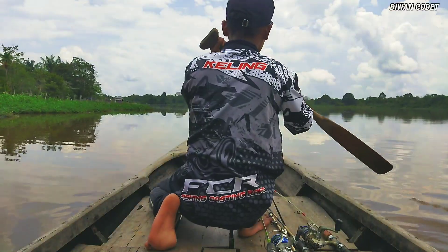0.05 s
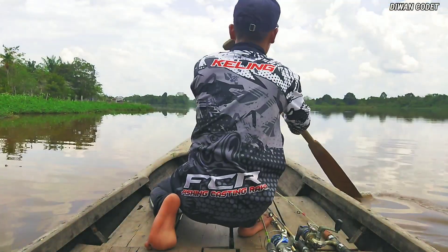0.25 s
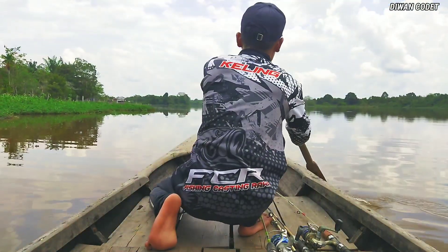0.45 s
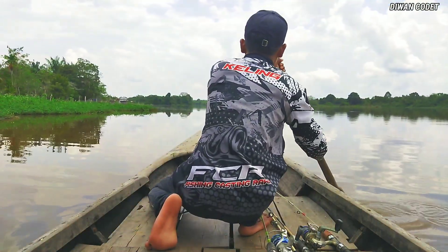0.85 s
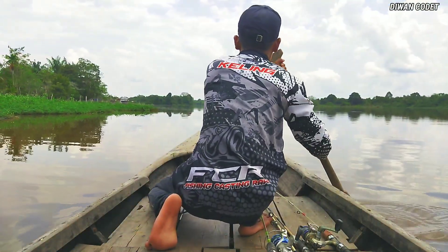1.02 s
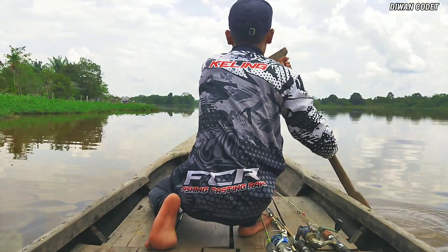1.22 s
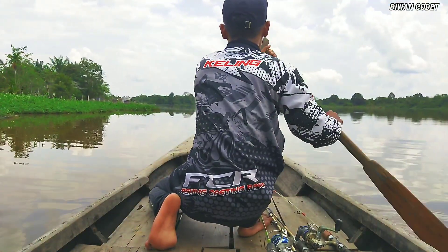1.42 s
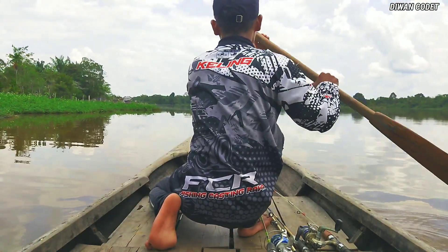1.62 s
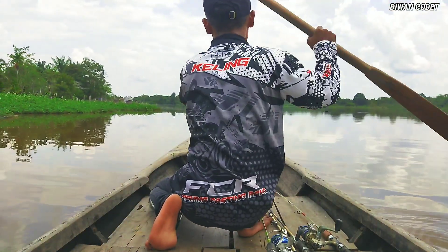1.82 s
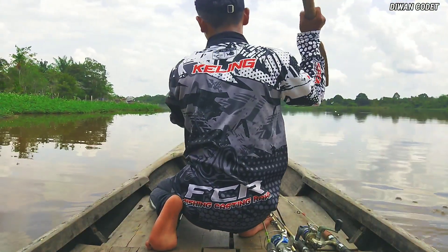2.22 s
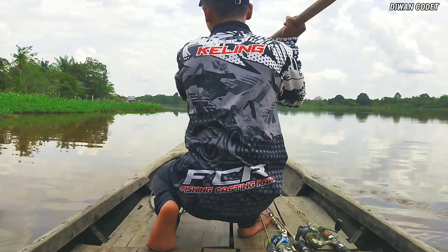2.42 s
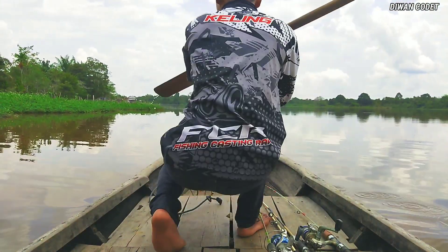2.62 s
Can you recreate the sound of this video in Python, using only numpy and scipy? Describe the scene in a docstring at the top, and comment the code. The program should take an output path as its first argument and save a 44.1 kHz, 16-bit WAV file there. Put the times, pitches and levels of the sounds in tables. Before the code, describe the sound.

Dry, high wooden creaks from a paddle and canoe come in close, squeaky runs, strongest from 0.4 to 1.2 seconds. At about 1.2 seconds the paddle hits the hull with one heavy, hollow thud. The creaking resumes at 1.6 with a brief sliding squeak and runs until 2.5, with a light tap near 2.4 and sharp ticks to 2.7. Soft water washes, gurgles and drips throughout.

```python
"""On a calm river, a wooden canoe is being paddled. Dry, high creaks come in runs, like a tight joint
sticking and slipping: trains of slips ring high, dry resonances, with ticks, chirps and one sliding
whistle. The paddle bumps the hull once heavily, and its shaft gives a faint tap and a light one.
Water washes, gurgles and drips off the blade, made of ringing bubbles over a soft rush."""
import sys
import numpy as np
from scipy import signal
from scipy.fft import rfft, irfft, next_fast_len
from scipy.io import wavfile
from scipy.ndimage import uniform_filter1d, map_coordinates

SR = 44100
rng = np.random.default_rng(int(sys.argv[2]) if len(sys.argv) > 2 else 0)


def store_wav(level_fs):
    """Save 16-bit WAV to argv[1]."""
    pcm = np.round(np.clip(np.atleast_2d(level_fs), -1, 1) * 32767)
    wavfile.write(sys.argv[1], SR, pcm.T.astype(np.int16))


N = 121275
T = np.arange(N) / SR


def amp(db):
    return 10 ** (np.asarray(db) / 20)


def unit(x):
    return x / np.sqrt(np.mean(abs(x) ** 2) + 1e-20)


def along(points, hz):
    """Read (Hz, value) points on a log frequency axis."""
    freqs, values = np.transpose(points)
    return np.interp(np.log(hz + 1), np.log(freqs + 1), values)


def curves(rows):
    """One automation curve for each column after the time."""
    times, *columns = np.transpose(rows)
    return [np.interp(T, times, column) for column in columns]


def filtered(x, response):
    """Pass x through a complex frequency response."""
    size = next_fast_len(N + SR // 2)
    return irfft(rfft(x, size) * response(np.fft.rfftfreq(size, 1 / SR)), size)[..., :N]


def coloured(x, eq):
    """x through an EQ of (Hz, dB) points, at rms 1."""
    return unit(filtered(x, lambda hz: amp(along(eq, hz))))


def noise(eq):
    return coloured(rng.standard_normal(N), eq)


def wobble(rate):
    """A smooth random curve, rate knots a second."""
    return map_coordinates(rng.standard_normal(4096), [T * rate], mode="wrap")


def decay(start, t60, attack):
    """Envelope of something struck; times in seconds."""
    age = np.maximum(T - start, 0)
    return amp(-60 * age / t60) * (1 - np.exp(-age / attack))


def gate(rows):
    """Open from the first row's time to the last, with 2 ms fades."""
    return np.clip(1 + np.minimum(T - rows[0][0], rows[-1][0] - T) / .002, 0, 1)


def placed(x, lag_s, wet_db, t60):
    """Stereo with short reflections from the boat; a positive lag reaches the right side first."""
    t = np.arange(SR // 4) / SR
    tail = rng.standard_normal((2, len(t))) * amp(-60 * t / t60) * (t > .001)
    wet = signal.fftconvolve(x[None], tail / np.linalg.norm(tail[0]), axes=1)[:, :N]
    direct = filtered(x, lambda hz: np.exp(np.outer([-1, 1], 1j * np.pi * hz * lag_s)))
    return direct + amp(wet_db) * wet


def panned(pair, balance):
    """Tip the stereo balance by frequency."""
    return filtered(pair, lambda hz: amp(np.outer([.5, -.5], along(balance, hz))))


def slips(rate, width_s, jitter, scatter_db):
    """Stick and slip: an uneven train of short swells, each with its own size and phase."""
    gap, size, turn = rng.standard_normal((4000, 3)).T
    at = (np.cumsum(np.exp(jitter * gap)) / rate * SR).astype(int)
    train = np.zeros(N, complex)
    train[at[at < N]] = (amp(scatter_db * size) * np.exp(1j * np.pi * turn))[at < N]
    t = np.arange(-256, 257) / SR
    return unit(signal.fftconvolve(train, np.exp(-.5 * (t / width_s) ** 2), "same"))


def joint_response(hz):
    """The squeaky joint: a broad body with sharp resonances."""
    # Each row: frequency in Hz, gain in dB.
    body = [(2700, -18), (3250, 2), (3650, 0.5), (4100, 4), (4450, 1), (4700, 4), (5250, 4.5), (5750, 4),
            (6300, -22)]
    # Each row: centre in Hz, width in Hz, relative level in dB.
    resonances = [(3740, 25, -4.5), (4093, 19.6, 1), (4140, 20, -26), (4646, 27, 0), (4730, 54, -0.5)]
    peaks = sum(amp(db) * 1j * hz * width / (centre ** 2 - hz ** 2 + 1j * hz * width)
                for centre, width, db in resonances)
    return amp(along(body, hz)) * (1 + amp(1) * peaks)


def creaks():
    """Big slips and fine chatter ring a shifting squeal and a hollow undertone; a rasp pulses along."""
    # One list per creak. Each row: time in seconds, squeal in dB, pitch in Hz, rasp in dB (both pre-EQ).
    gestures = [
        [(0, -33, 4830, -34), (.05, -28, 4770, -39.5), (.075, -53, 4700, -40.5), (.13, -45, 4700, -50),
         (.154, -24.5, 4740, -61), (.18, -42, 4360, -59)],
        [(.211, -31, 4795, -53), (.266, -26.5, 4676, -39), (.28, -66, 4700, -70), (.296, -23, 4620, -58),
         (.34, -32, 4770, -66), (.378, -42, 4800, -59)],
        [(.396, -19, 4690, -32.5), (.42, -14.5, 4580, -28), (.438, -22, 4170, -31), (.448, -29, 4200, -49),
         (.482, -24, 4460, -55)],
        [(.489, -10.5, 4163, -32), (.51, -13, 4400, -40.5), (.54, -18.5, 4550, -40.5), (.556, -25, 4660, -41.5),
         (.59, -28, 4750, -44)],
        [(.598, -19.5, 4825, -29.5), (.62, -17, 4480, -35.5), (.642, -16, 4320, -31), (.69, -17, 4160, -40.5),
         (.724, -16.5, 4170, -44)],
        [(.73, -29, 4342, -59), (.765, -30.5, 4330, -52.5), (.825, -35.5, 5050, -48),
         (.875, -26.5, 4600, -52.5), (.925, -28, 4360, -45.5)],
        [(.935, -18, 4870, -30), (.98, -18, 4637, -28), (1.022, -18, 4710, -31), (1.038, -23.5, 4550, -37.5),
         (1.09, -23, 5190, -35.5), (1.142, -27, 4970, -39), (1.18, -30, 4670, -31)],
        [(1.584, -22.5, 4814, -35.5), (1.605, -21.5, 4807, -31.5), (1.63, -30.5, 3647, -40),
         (1.66, -22.5, 3680, -40), (1.68, -22.5, 4097, -37.5), (1.712, -19.5, 4240, -35.5),
         (1.745, -33, 4620, -46.5), (1.768, -27, 4540, -40)],
        [(1.775, -25.5, 4870, -36), (1.82, -20, 4260, -34), (1.905, -20, 4184, -38.5), (1.94, -33.5, 4450, -43),
         (2.02, -34.5, 5780, -44), (2.1, -58, 4400, -44)],
        [(2.181, -27, 4260, -40), (2.194, -19, 4695, -30.5), (2.28, -21.5, 4624, -33.5),
         (2.325, -26, 4570, -41.5), (2.42, -22.5, 4495, -42.5), (2.48, -25, 4270, -41.5),
         (2.51, -40, 4370, -34.5)],
    ]
    # Each row, one per creak: slips per second, big slips over chatter in dB, undertone over rasp in dB.
    friction = [(109, 0.5, 3.5), (114.8, 15, 7), (197.5, -30, -0.5), (231.7, 8.5, 2.5), (140.5, 3.5, -2.5),
                (80, 8, 11.5), (142.2, -6, 4), (170.3, -4, 1.5), (139, 1, -7), (120.8, -1, 1)]
    # Tone of the rasp and of the joint's lower ring. Each row: frequency in Hz, gain in dB.
    rasp_eq = [(900, -6.5), (1800, -2), (2700, 4), (3300, -11), (3900, 13), (5500, 13), (6200, -40),
               (7350, -16.5), (8200, -2.5), (11500, 2.5), (13500, -1.5), (15000, 2.5), (15900, -30)]
    hollow_eq = [(1400, -23), (1950, -12.5), (2250, 1.5), (2750, 2.5), (2980, -0.5), (3250, -38),
                 (4000, -41)]
    hollow_hz = 2583
    squeal, rasp_envelope, hollow = np.zeros((3, N))
    for rows, (rate, slip_db, hollow_db) in zip(gestures, friction):
        squeal_db, pitch_hz, rasp_db = curves(rows)
        big = amp(slip_db) * slips(rate, width_s=.00047, jitter=.0821, scatter_db=2)
        chatter = slips(rate=750, width_s=.00024, jitter=.25, scatter_db=1.6)
        power = uniform_filter1d(abs(big + chatter) ** 2, size=600)
        drive = gate(rows) * (big + chatter) / np.sqrt(abs(power) + 1e-6)
        squeal += amp(squeal_db) * np.real(drive * np.exp(2j * np.pi * np.cumsum(pitch_hz) / SR))
        hollow += amp(rasp_db + hollow_db) * np.real(drive * np.exp(2j * np.pi * hollow_hz * T))
        rasp_envelope += gate(rows) * amp(rasp_db) * np.sqrt(.44 * abs(drive) ** 2 + .17)
    squeal = filtered(amp(-2.5) * squeal, joint_response)
    hollow = filtered(hollow, lambda hz: amp(along(hollow_eq, hz)))
    return squeal + hollow + amp(1) * rasp_envelope * noise(rasp_eq)


def bubbles(count, low_hz, high_hz, cycles, scatter_db):
    """A cloud of small bubbles, each rising in pitch as it dies away, at rms 1."""
    when, pitch, size = rng.random((count, 3)).T[:, :, None]
    t = np.arange(1500) / SR
    hz = low_hz * (high_hz / low_hz) ** pitch
    age = t * hz / cycles
    envelope = amp(-scatter_db * np.log(np.maximum(size, .02))) * amp(-60 * age)
    ring = envelope * np.sin(2 * np.pi * hz * t * (1 + .13 * np.minimum(age, 1)))
    at = (when * N + t * SR).astype(int)
    return unit(np.bincount(at.ravel(), ring.ravel(), N)[:N])


def water():
    """Splash and gurgle along the blade, bubbles over a soft rush; the hull drums faintly on the water."""
    # Each row: time in seconds, splash level in dB, gurgle level in dB.
    wash = [(0, -33.5, -61), (.27, -32.5, -61), (.37, -43, -53), (.45, -34.5, -50), (.55, -42, -47.5),
            (.8, -40.5, -45), (.93, -43.5, -44.5), (1.12, -39.5, -45), (1.25, -40, -42.5), (1.34, -45, -58),
            (1.42, -40.5, -38), (1.56, -40.5, -50.5), (1.8, -42.5, -54), (1.98, -41, -57.5),
            (2.07, -40.5, -51), (2.16, -48, -50.5), (2.32, -48.5, -50), (2.5, -38.5, -52),
            (2.58, -44.5, -51), (2.68, -37.5, -56), (2.75, -37, -44.5)]
    # Bright spray and dark churn. Each row: frequency in Hz, gain in dB.
    splash_eq = [(900, -16.5), (1700, -17), (2400, -3.5), (3150, -3.5), (3800, 5.5), (4700, 4.5), (5600, 0),
                 (6800, -1), (7400, -14), (12000, -4.5), (15000, -14), (16000, -28)]
    gurgle_eq = [(25, -96), (70, -21), (150, 0), (260, -1.5), (450, 6), (800, 2), (1400, -0.5), (2500, -2),
                 (6000, -74)]
    # Each row: frequency in Hz, left minus right in dB.
    splash_balance = [(2000, 3), (5000, 0.5), (7000, 7), (12000, 2)]
    splash_db, gurgle_db = curves(wash)
    fizz = bubbles(count=2600, low_hz=1800, high_hz=11000, cycles=40, scatter_db=3)
    splash = amp(splash_db + 1.5 * wobble(40)) * coloured(fizz + .7 * rng.standard_normal(N), splash_eq)
    glug = bubbles(count=350, low_hz=276, high_hz=2200, cycles=7.8, scatter_db=7.5)
    gurgle = amp(gurgle_db + 1.5 * wobble(14)) * unit(noise(gurgle_eq) + .6 * coloured(glug, gurgle_eq))
    rumble_eq = [(25, -52), (60, -14), (110, -9.5), (155, -10), (220, -4.5), (400, -8.5), (1000, -43)]
    body = gurgle + plops_and_drips() + amp(-55) * noise(rumble_eq)
    spray = panned(placed(splash, lag_s=.000395, wet_db=6, t60=.058), splash_balance)
    return spray + placed(body, lag_s=.00012, wet_db=-3, t60=.19)


def plops_and_drips():
    """Air pockets swell, ring unsteadily and glide as the water closes over them."""
    # Closing pockets, and drops falling from the blade.
    # Each row: start in seconds, level in dB, pitch in Hz, glide in octaves a second, t60 in seconds.
    plops = [(0.43, -20, 546, -1, 0.061), (0.454, -15.5, 1540, -2, 0.018), (0.459, -29, 1180, 2.5, 0.13),
             (0.921, -22.5, 361, -10, 0.042), (1.079, -22.5, 780, -19, 0.052),
             (1.085, -24.5, 600, -8.5, 0.14), (1.402, -18.5, 330, 15.5, 0.065),
             (1.417, -25, 420, -6.5, 0.11), (1.787, -27, 780, 15, 0.05), (1.881, -30, 554, 0, 0.098),
             (1.89, -29, 690, 6.5, 0.048), (2.066, -29.5, 1560, 2.5, 0.079), (2.07, -21.5, 2200, 1, 0.041),
             (2.099, -33, 400, 3, 0.21), (2.2, -31.5, 520, 1.5, 0.095), (2.306, -33.5, 660, -2, .12)]
    drips = [(0.092, -21.5, 3044, 8, 0.059), (0.263, -22, 2150, 5.5, 0.074),
             (0.475, -19.5, 2420, -1.5, 0.053), (1.25, -15, 2387, 4, 0.015), (2.113, -27, 2640, 2.5, 0.24),
             (2.474, -27, 2297, 1, 0.094), (2.526, -27, 3074, 4, 0.071), (2.655, -20, 2880, 5, 0.07)]
    out = np.zeros(N)
    for start, db, hz, glide, t60 in plops + drips:
        pitch_hz = hz * 2 ** (glide * np.clip(T - start, 0, t60))
        phase = 2 * np.pi * np.cumsum(pitch_hz) / SR + wobble(hz / 5)
        out += amp(db) * decay(start, t60, attack=.49 / hz) * np.sin(phase)
    return out


def ticks():
    """Sharp, bright snaps as the joint lets go."""
    # Each row: start in seconds, level in dB, t60 in seconds.
    snaps = [(0.294, -35, .03), (1.153, -25, 0.034), (1.163, -26, 0.034), (2.41, -27.5, 0.01),
             (2.555, -25, 0.012), (2.611, -27, 0.026), (2.625, -48, 0.04), (2.656, -42, .035),
             (2.667, -25, 0.064)]
    # Each row: frequency in Hz, gain in dB.
    snap_eq = [(1200, -7), (2800, -4.5), (5000, 11), (6600, 8.5), (7600, -4), (10000, 2), (15000, -11.5)]
    return noise(snap_eq) * sum(amp(db) * decay(start, t60, attack=.00051) for start, db, t60 in snaps)


def knocks(blows, modes, swell_cycles, contact_eq, contact_db, contact_t60, attack):
    """Struck wood: a puff of contact noise, then modes that swell over a few cycles, the low ones last."""
    out = np.zeros(N)
    for start, db in blows:
        ring = np.zeros(N)
        for k, (hz, mode_db, t60) in enumerate(modes):
            envelope = amp(mode_db) * decay(start, t60, swell_cycles / hz)
            ring += (-1) ** k * envelope * np.sin(2 * np.pi * hz * (T - start))
        contact = amp(contact_db) * noise(contact_eq) * decay(start, contact_t60, attack)
        out += amp(db) * (ring + contact)
    return out


def paddle_taps():
    """The paddle touches the hull lightly: a clack, and the shaft rings."""
    # Each row: start in seconds, level in dB.
    taps = [(.428, -41.5), (2.387, -31.5)]
    # Each row: pitch in Hz, relative level in dB, t60 in seconds.
    shaft_modes = [(140.8, -2.5, 0.38), (169, -4, 0.39), (269, -4, 0.22), (615, 3, 0.11),
                   (664, -4.5, 0.099), (840, 12, 0.043), (1210, 6, 0.12), (1314, 2.5, 0.068),
                   (1960, -3, 0.11)]
    # Each row: frequency in Hz, gain in dB.
    clack_eq = [(60, -33), (200, 0), (1200, -9), (2100, -8), (3500, -41), (9000, -55)]
    return knocks(taps, shaft_modes, swell_cycles=1,
                  contact_eq=clack_eq, contact_db=7.5, contact_t60=.13, attack=.0017)


def chirps():
    """The joint catches and gives brief, nearly pure rings."""
    # Each row: centre in seconds, peak in dB, pitch in Hz, half length in seconds.
    catches = [(0.434, -5, 4095, 0.0022), (0.4893, -8, 4200, 0.0028), (0.517, -17, 4300, 0.00038),
               (0.699, -6, 4100, 0.0013), (1.15, -11, 5100, 0.0011), (1.168, -16.5, 4700, 0.0015),
               (1.18, -15.5, 4790, 0.0025), (1.677, -14.5, 4090, 0.0042), (1.706, -14, 4110, 0.0027),
               (2.18, -15.5, 4106, 0.0019), (2.463, -11.5, 4100, 0.0013), (2.557, -18, 4340, 0.00039),
               (2.612, -12.5, 4130, 0.00044), (2.657, -16.5, 4120, 0.00072)]
    return sum(amp(db) * np.exp(-.5 * ((T - at) / half) ** 2) * np.sin(2 * np.pi * hz * (T - at))
               for at, db, hz, half in catches)


def hull_bump():
    """The paddle hits the hull heavily: a thud, and the hull booms."""
    # Each row: start in seconds, level in dB.
    bumps = [(1.174, -8.5)]
    # Each row: pitch in Hz, relative level in dB, t60 in seconds.
    hull_modes = [(110.2, -12.5, 0.35), (155, 7.5, 0.21), (187.6, -5, 0.24), (276.7, 8, 0.12),
                  (375.8, 2, 0.12), (501.6, -7.5, 0.14), (637, -1.5, 0.061), (815, -6, 0.069),
                  (1000, 2.5, 0.03), (1330, -14, 0.045)]
    # Each row: frequency in Hz, gain in dB.
    thud_eq = [(20, -33), (70, -7), (160, 19.5), (400, 9.5), (1000, -9), (1600, -11.5), (4000, -25),
               (9000, -68)]
    return knocks(bumps, hull_modes, swell_cycles=2.34,
                  contact_eq=thud_eq, contact_db=0, contact_t60=.2, attack=.0015)


def whistle():
    """One creak slides down and up as a single fluttering tone."""
    # Each row: time in seconds, level in dB, pitch in Hz.
    slide = [(1.606, -36, 5164), (1.616, -15, 4550), (1.628, -24.5, 3650), (1.65, -27, 3500),
             (1.668, -33, 3810), (1.69, -18, 4650)]
    level_db, hz = curves(slide)
    envelope = gate(slide) * amp(level_db + 2.6 * wobble(300))
    return envelope * np.sin(2 * np.pi * np.cumsum(hz) / SR + .5 * wobble(400))


def scene():
    """The joint's sounds reach the left side first, the water and knocks the right."""
    # Each row: frequency in Hz, left minus right in dB.
    joint_balance = [(2000, 0), (4000, 4), (4400, -2), (4850, 10), (5500, 0.5), (7000, 14), (12000, 8)]
    joint = placed(creaks() + chirps() + whistle() + ticks(), lag_s=-.0005, wet_db=-1.5, t60=.02)
    bump = placed(hull_bump(), lag_s=.00018, wet_db=-29.5, t60=.2)
    taps = placed(paddle_taps(), lag_s=.0001, wet_db=-5.5, t60=.05)
    return panned(joint, joint_balance) + water() + bump + taps


def record(dry):
    """Round off peaks near full scale, then cut everything above 15.9 kHz."""
    rounded = dry / (1 + abs(dry) ** 8) ** (1 / 8)
    return filtered(rounded, lambda hz: hz < 15900)


dry = scene()
out = record(dry)
store_wav(out)
```